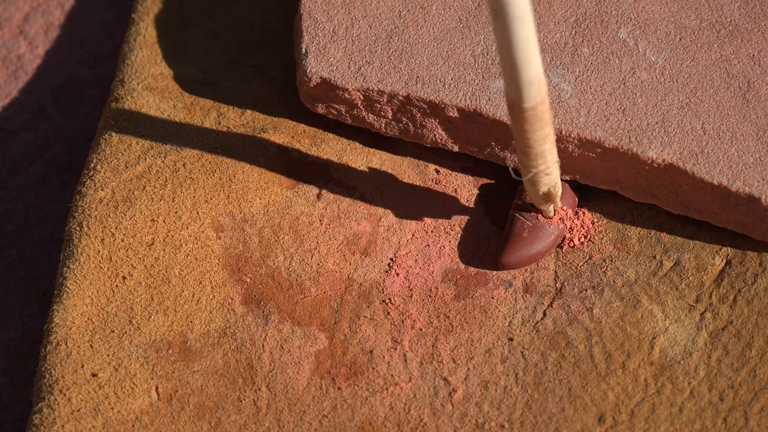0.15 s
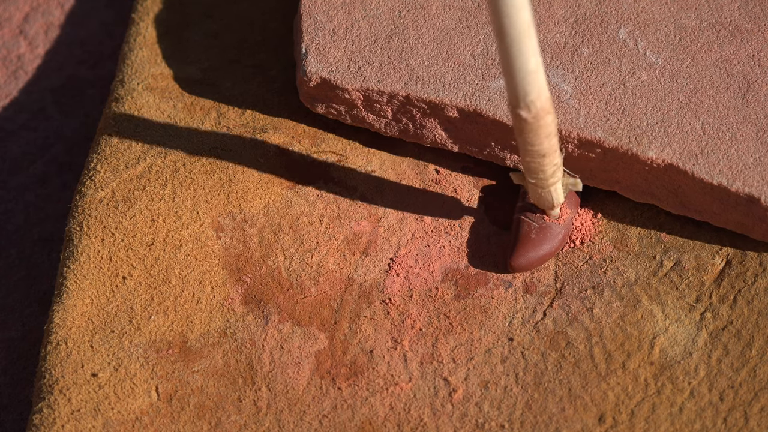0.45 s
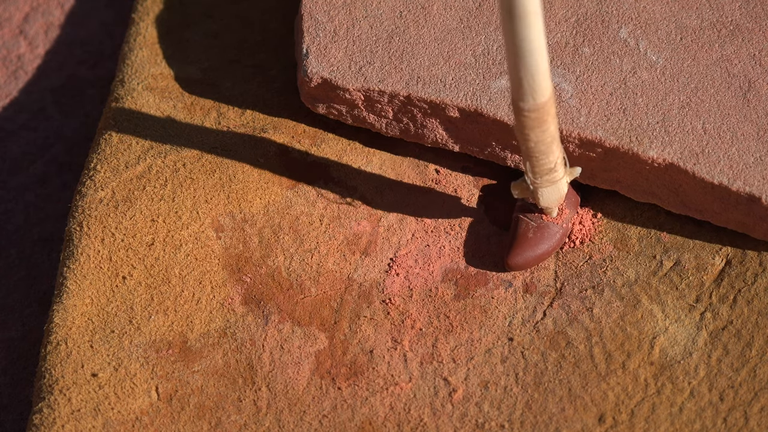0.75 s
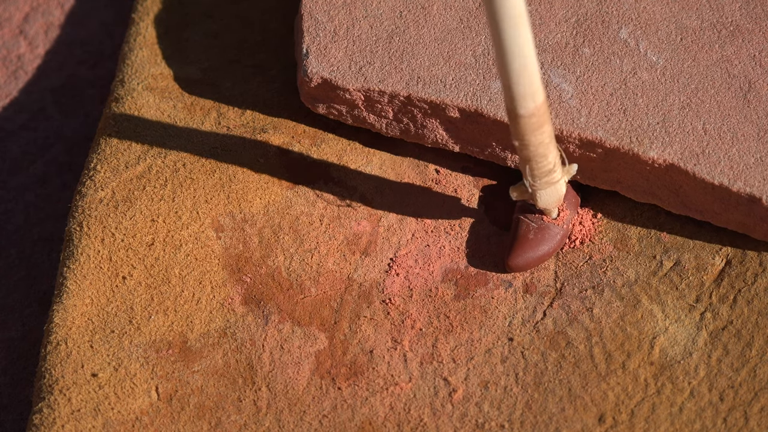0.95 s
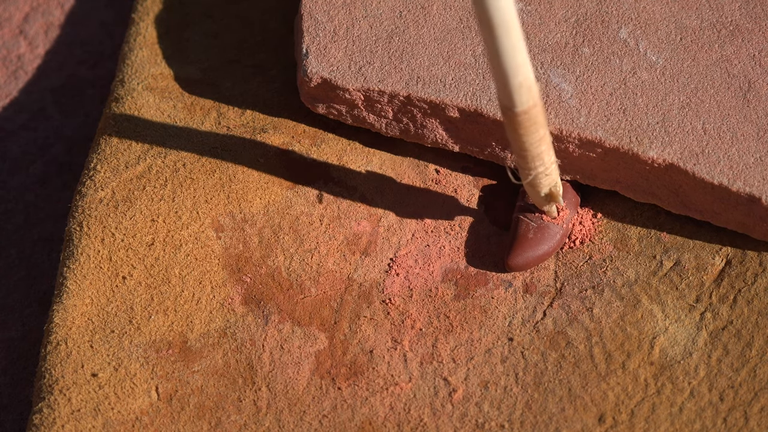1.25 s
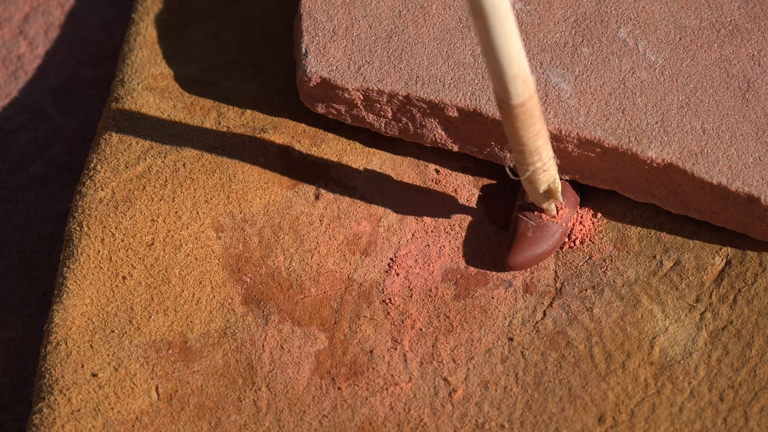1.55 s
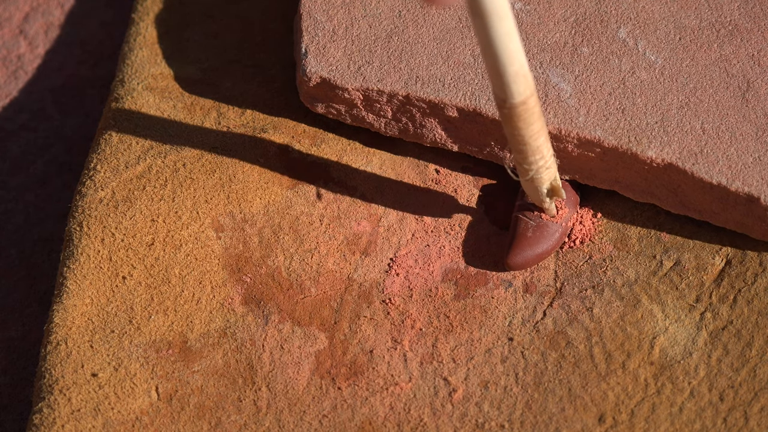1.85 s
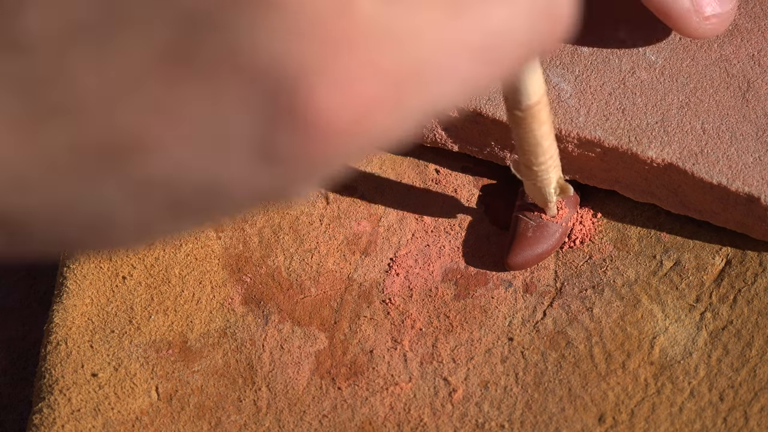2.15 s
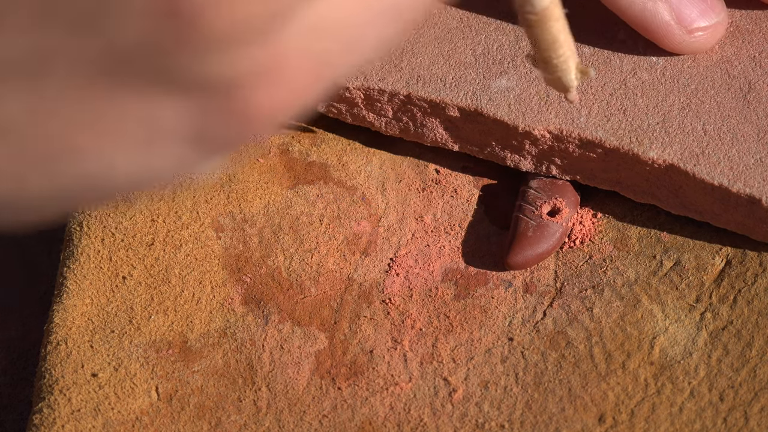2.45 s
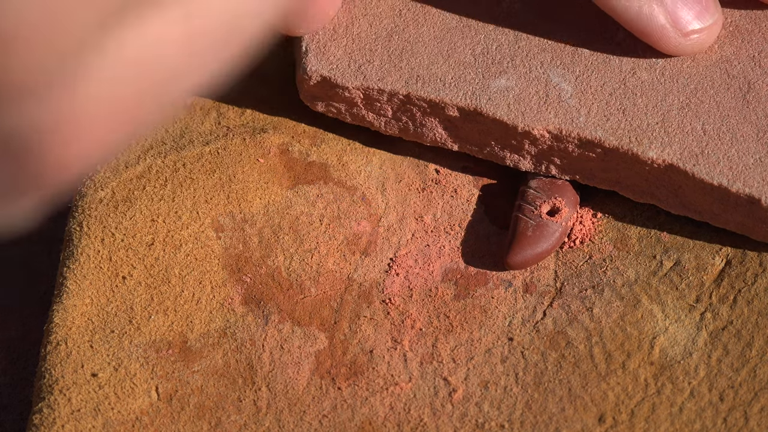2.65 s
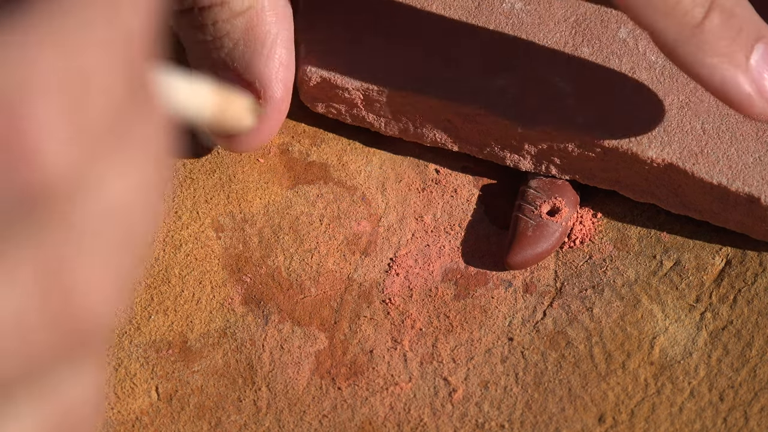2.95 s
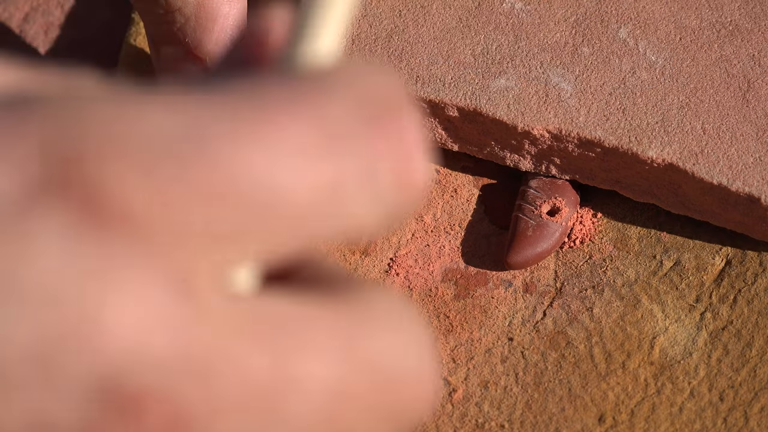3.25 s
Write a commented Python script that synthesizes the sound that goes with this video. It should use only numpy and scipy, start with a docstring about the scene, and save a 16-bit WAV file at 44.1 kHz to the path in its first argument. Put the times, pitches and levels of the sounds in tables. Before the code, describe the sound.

A hand drill grinds into a small stone in short twists, then scrapes loose.

```python
"""Gritty crunching comes first: a stone-tipped wooden drill is twisted four times in a small soft stone.
Its tip crushes grains, catches and chatters. Then fingers slide on the shaft with a faint squeak,
the tip scrapes and snaps loose from the hole, and a hand reaches in.
Behind it all, light air rumbles on the microphone over a quiet hiss, and a thin whistle comes and goes."""
import sys
import numpy as np
from scipy import signal
from scipy.fft import rfft, irfft
from scipy.io import wavfile
from scipy.ndimage import uniform_filter1d

SR = 44100
rng = np.random.default_rng(int(sys.argv[2]) if len(sys.argv) > 2 else 0)


def put_to_file(sound):
    """Save the sound as 16-bit audio at rate SR, in the file named by the first command-line argument."""
    columns = np.atleast_2d(sound).T  # one column per channel
    safe = np.clip(columns, -1, 1)
    whole_steps = np.round(safe * 32767)
    wavfile.write(sys.argv[1], SR, whole_steps.astype(np.int16))


N = 149940
T = np.arange(N) / SR  # time of each sample [s]
HZ = np.maximum(np.arange(N // 2 + 1) * SR / N, 1)  # frequency of each point in a spectrum [Hz]

# Movements, each fading in and out: (start [s], rise [s], hold [s], fall [s], level [dB])
TWISTS = [(-.03, 0.064, 0.11, 0.1, -39.5), (.235, 0.049, 0.14, 0.041, -40), (.49, 0.11, 0.11, 0.038, -38),
          (.745, 0.084, 0.088, 0.11, -40.5)]  # the drill turns in the hole
TIP_DRAG = (.25, .22, .45, .1, -59)  # the tip keeps dragging lightly between twists
STONE_KNOCK = (.352, .006, .01, .018, -45)  # the hardest push knocks the stone on its slab
SCRAPES = [(2.0805, 0.0019, 0.035, 0.019, -33.5), (2.06, 0.039, 0.05, 0.047, -41),
           (1.927, 0.16, 0.04, 0.18, -46.5)]  # the tip scrapes loose
PALM_ROLLS = [(-.06, 0.2, 0.039, 0.058, -48.5), (.215, 0.087, 0.066, 0.11, -43),
              (.48, 0.15, 0.053, 0.046, -41), (.73, 0.11, 0.033, 0.15, -40)]  # palms roll the shaft with each twist
FINGER_SLIDES = [(.93, .073, .1, .3, -55), (1.2, 0.37, .02, .11, -49), (1.732, .012, .003, 0.058, -46.5),
                 (1.785, 0.022, .012, 0.055, -48), (1.77, 0.14, .04, .19, -46.5), (2.0, .07, .18, .08, -55),
                 (2.33, .011, .014, .012, -53), (3.02, .025, .003, .015, -53.5),
                 (3.08, 0.077, .018, .022, -51.5), (3.19, 0.042, .11, 0.06, -51.5)]  # fingers slide on the wood
ARM_SWEEPS = [(1.85, .22, 0.12, 0.19, -50), (2.42, 0.29, 0.22, 0.11, -50)]  # the arm sweeps in

# The tip catches: (time [s], length [s], crunch level [dB], crunch pitch [Hz],
# chatter pitch [Hz], chatter level [dB], chatter bend to either side [Hz])
CATCHES = [(.044, 0.017, -35, 3550, 2700, -34, -200), (.073, 0.02, -39, 5500, 2580, -39.5, 200),
           (0.098, 0.019, -34.5, 5600, 2470, -41.5, -1), (0.132, .015, -36.5, 8050, 2470, -35, -350),
           (0.161, .014, -37.5, 4180, 2236, -35, -350), (0.289, .010, -37, 5250, 2390, -31.5, -150),
           (0.311, .011, -37.5, 5000, 2460, -33, -350), (0.327, 0.012, -34.5, 5000, 1720, -42, -300),
           (.354, 0.013, -28, 4270, 4170, -35, 499.5), (.365, 0.011, -29.5, 8700, 4663, -28.5, 400),
           (.383, 0.01, -33.5, 4200, 2900, -50, 0.5), (0.416, 0.016, -34.5, 4890, 2570, -44, 1),
           (.545, 0.0041, -45, 3400, 3300, -40, -200), (0.558, .013, -39, 3160, 2350, -34.5, -200),
           (.644, 0.012, -30.5, 6400, 3200, -33, -600), (.651, 0.0092, -28, 4260, 2625, -27, -150),
           (0.671, 0.017, -35.5, 3880, 2265, -33, -300), (0.712, .011, -39, 6800, 2150, -47.5, 0),
           (.727, 0.012, -33, 6200, 2030, -34.5, -150), (0.832, 0.011, -43, 4400, 2364, -34.5, 250),
           (0.855, 0.025, -32.5, 4660, 2727, -32, 300.5), (0.894, 0.018, -29, 5830, 1723, -37.5, -200),
           (0.925, 0.019, -39.5, 4500, 5120, -40, 599)]
# Sudden sounds: (time [s], level [dB])
BITES = [(.2865, -42), (.353, -31), (0.407, -32.5), (.543, -38), (.638, -28.5)]  # the tip bites into fresh grit
SNAPS = [(2.1175, -18), (2.1345, -29), (2.1555, -29)]  # the tip comes free; each tone of SNAP_TONES adds its own level
# The tones in a snap: (pitch [Hz], relative level [dB], time to fade by 60 dB [s])
SNAP_TONES = [(2940, -11.5, 0.025), (3460, -6.5, 0.02), (3860, -14, .012), (4530, -12, .005),
              (5150, -21, .008)]
# The turning shaft squeaks: (middle [s], half length [s], pitch [Hz], bend to either side [Hz], level [dB])
SHAFT_SQUEAK = (1.11, .11, 5850, 450, -61)
# Noises with a pitch: (start [s], rise [s], hold [s], fall [s], level [dB], pitch [Hz], width [Hz])
SHAFT_RUBS = [(1.735, .012, .004, .02, -58, 2800, 400), (1.735, .01, .004, .02, -56, 12150, 350),
              (2.328, .014, .006, .012, -48, 3100, 1200), (2.356, .004, .002, .009, -52, 2800, 2200),
              (3.17, .009, .002, .01, -54, 5100, 500), (3.21, .025, .012, .04, -54, 4850, 140),
              (3.28, .03, .025, .03, -58, 4850, 130), (3.305, .015, .01, .022, -55.5, 2720, 200),
              (3.2, .035, .09, .05, -62, 8700, 250), (3.19, .045, .07, .07, -59, 3800, 1200)]
WHISTLES = [(1.135, 0.11, 0.036, 0.13, -54.5, 760, 130), (2.35, 0.16, 0.116, .09, -57, 1263, 120),
            (2.955, 0.1, 0.23, .07, -60, 1310, 69.6), (3.148, 0.04, 0.045, .025, -49, 1338, 54.5)]

# Pitches at which things ring; narrow ones ring longer: (pitch [Hz], width [Hz], relative level [dB])
DRILL_RINGS = [(1420, 90, -1), (2214, 45, -1), (2394, 70, -2), (2688, 40, 2), (2778, 30, 1), (3080, 35, -2),
               (3465, 40, 2), (3800, 50, -2), (3912, 35, -1), (4350, 60, 0), (4590, 55, 0), (4835, 40, -3),
               (4935, 45, -5), (5160, 45, 1), (5640, 50, -3), (6200, 50, -3), (6325, 40, 0),
               (8250, 250, -7)]  # drill and stone together
KNOCK_RINGS = [(371, 40, 8), (608, 50, 3), (888, 40, 3)]
SCRAPE_RINGS = [(750, 110, 2), (2950, 90, 2), (3460, 60, 0), (3740, 70, 0), (4540, 90, 1)]
SHAFT_RINGS = [(2110, 100, 4), (2760, 140, 5), (4780, 150, 0), (5800, 170, -2), (6800, 110, -2),
               (7200, 110, -2), (8180, 230, 2), (9450, 220, -1), (10800, 240, 1), (12200, 260, 3),
               (13580, 180, 1)]

# The colour of each noise, or how strong it is from low to high: (frequency [Hz], relative level [dB])
GRIND_COLOUR = [(150, -30), (400, -15), (1100, -13), (1400, -8), (1580, -13), (1850, 0), (2700, -3),
                (3150, -1.5), (4500, -2), (5500, -2.5), (6400, -2.5), (8500, -7.5), (9600, -12.5),
                (13000, -13), (16000, -19.5)]
CRUNCH_COLOUR = [(150, -21), (400, -14), (1100, -13), (1450, -4), (2000, 1), (2700, 0), (3200, 1.5),
                 (4400, 1.5), (5500, -2), (6400, 1), (8300, -3), (10000, -7.5), (16000, -7)]
KNOCK_COLOUR = [(100, -14), (230, -3), (700, -6), (3000, -32)]
SCRAPE_COLOUR = [(100, 0), (280, 0.5), (520, 6), (760, -1), (1100, 1), (1350, -7), (2650, -7), (2900, -2),
                 (3800, 2.5), (5200, -1), (5700, -5.5), (8000, -10), (11000, -15.5), (16000, -33)]
ROLL_COLOUR = [(500, -16), (1500, 2), (2200, -0.5), (5000, -4.5), (8300, -5), (10000, -2.5), (12200, -0.5),
               (16000, 0)]
SLIDE_COLOUR = [(500, -20), (2000, -8.5), (3500, -3.5), (6000, -1), (8300, -1.5), (10000, -3.5),
                (12300, -2), (14000, -6), (16000, 2)]
SWEEP_COLOUR = [(200, -2), (800, 4.5), (1600, 3.5), (2500, 3.5), (4000, 0.5), (7000, -5), (16000, -15.5)]
SWAY_COLOUR = [(5, -7), (13, 2), (22, 1.5), (32, -10), (50, -25.5), (100, -40), (300, -89.5)]
RUMBLE_COLOUR = [(15, -16), (35, -0.5), (50, 0.5), (80, -9), (125, -18.5), (250, -33.5), (600, -53.5)]
HISS_COLOUR = [(60, 8.5), (150, 5), (300, 0.5), (500, -1), (750, -0.5), (1100, -4), (1600, -11),
               (3000, -14), (6000, -16.5), (10000, -20), (16000, -21)]

# How the air's deep sway and the rumble above it rise and fall: (time [s], relative level [dB])
SWAY_LEVELS = [(0.0, -32.5), (0.42, -26.5), (0.74, -36.5), (1.44, -33.5), (1.46, -19.5), (1.61, -35),
               (2.06, -33), (2.25, -48.5), (2.5, -30), (2.67, -38.5), (3.12, -31), (3.4, -37.5)]
RUMBLE_LEVELS = [(0.0, -41), (0.25, -36.5), (0.26, -39), (0.51, -43), (1.02, -45.5), (1.52, -45),
                 (1.57, -41), (1.65, -48.5), (1.9, -43.5), (2.31, -49.5), (2.35, -41.5), (2.48, -58),
                 (2.57, -40), (3.04, -48), (3.1, -41.5), (3.4, -61)]

CHATTER_WIDTH_HZ = 210  # wider makes the chatter's pitch rougher


def grinding():
    """The turning tip crushes thousands of tiny grains, which make the drill and the stone ring."""
    powder = coloured(grit(per_s=7500, spread_db=3), GRIND_COLOUR, DRILL_RINGS)
    powder *= flutter(rate_hz=69, depth_db=3.5)
    return (powder + from_db(-9) * cracking_grains()) * swells(TWISTS + [TIP_DRAG])


def cracking_grains():
    """Larger grains burst, each ringing briefly at one of 16 pitches."""
    pitches_hz = np.geomspace(1900, 8600, 16)
    bursts = sum(rfft(grit(per_s=30, spread_db=-0.5)) * resonance(hz, width_hz=200) for hz in pitches_hz)
    return unit_level(irfft(bursts, N))


def catching():
    """Each time the tip catches, grit crunches and the tip chatters by sticking and slipping."""
    crunch_spectrum = rfft(coloured(grit(per_s=12000, spread_db=2), CRUNCH_COLOUR))
    rings = np.array([from_db(db) * resonance(hz, width) for hz, width, db in DRILL_RINGS])
    strikes = 1 + 1.4 * rng.uniform(-1.25, 1, (len(CATCHES), len(rings)))  # a new mix of rings per catch
    wobble = uniform_filter1d(phase_wobble(CHATTER_WIDTH_HZ), size=24)
    stick_slip = flutter(rate_hz=220, depth_db=3.5)
    out = np.zeros(N)
    for (time, length, crunch_db, crunch_hz, hz, chatter_db, bend_hz), strike in zip(CATCHES, strikes):
        grip = 1 / (1 + (1.86 * np.abs(T - time) / length) ** 3.3)  # a short bump with steep sides
        focus = 1 + 1.8 * resonance(crunch_hz, width_hz=1400)
        crunch = unit_level(irfft(crunch_spectrum * (1 + strike @ rings) * focus, N))
        chatter = rough_tone(wobble, time, length, hz, bend_hz) * stick_slip
        out += grip * (from_db(crunch_db) * crunch + from_db(chatter_db) * chatter)
    return out


def pressing():
    """The tip bites suddenly into fresh grit, and the hardest push knocks the stone on its slab."""
    fade_s = 0.0047
    bite_level = sum(from_db(db) * (T >= time) * np.exp(-np.abs(T - time) / fade_s) for time, db in BITES)
    knock = coloured(grit(per_s=3000, spread_db=1.5), KNOCK_COLOUR, KNOCK_RINGS)
    fresh_grit = coloured(grit(per_s=11000, spread_db=0), GRIND_COLOUR, DRILL_RINGS)
    return fresh_grit * bite_level + knock * swell(*STONE_KNOCK)


def pulling_out():
    """The tip drags up the wall of the hole and snaps free with three ringing clicks."""
    out = coloured(grit(per_s=8000, spread_db=2), SCRAPE_COLOUR, SCRAPE_RINGS) * swells(SCRAPES)
    age = T[:SR // 10]
    snap = sum(from_db(db - 60 * age / fade) * np.sin(2 * np.pi * hz * age) for hz, db, fade in SNAP_TONES)
    for time, db in SNAPS:
        start = int(time * SR)
        out[start:start + len(snap)] += from_db(db) * snap
    return out


def handling():
    """Skin rolls, slides and rubs on the wooden shaft, and the arm sweeps in."""
    rolls = coloured(white_noise(), ROLL_COLOUR, SHAFT_RINGS) * swells(PALM_ROLLS)
    slides = coloured(grit(per_s=7000, spread_db=2), SLIDE_COLOUR, SHAFT_RINGS) * swells(FINGER_SLIDES)
    slides *= flutter(rate_hz=170, depth_db=1)
    rubs = sum(pitched_noise(hz, width) * swell(*shape) for *shape, hz, width in SHAFT_RUBS)
    sweeps = coloured(grit(per_s=12000, spread_db=-0.5), SWEEP_COLOUR) * swells(ARM_SWEEPS)
    return rolls + slides + rubs + sweeps


def shaft_squeak():
    """A thin, rough squeak rises as the shaft turns between the fingers."""
    middle, half_length, hz, bend_hz, db = SHAFT_SQUEAK
    wobble = phase_wobble(2 * CHATTER_WIDTH_HZ)
    arch = np.clip(1 - ((T - middle) / half_length) ** 2, 0, 1)
    return from_db(db) * arch * rough_tone(wobble, middle, half_length, hz, bend_hz)


def moving_air():
    """Light air pushes on the microphone, making a very deep sway and a low rumble."""
    sway_db = 3 + np.interp(T, *np.transpose(SWAY_LEVELS))
    rumble_db = 2 + np.interp(T, *np.transpose(RUMBLE_LEVELS))
    sway = coloured(white_noise(), SWAY_COLOUR) * from_db(sway_db)
    rumble = coloured(white_noise(), RUMBLE_COLOUR) * from_db(rumble_db)
    return sway + rumble


def faint_whistle():
    """A thin, breathy whistle comes and goes."""
    return sum(pitched_noise(hz, width) * swell(*shape) for *shape, hz, width in WHISTLES)


def quiet_hiss():
    """A soft, steady hiss lies under everything."""
    return from_db(-50.5) * coloured(white_noise(), HISS_COLOUR)


def from_db(db):
    """Turn decibels into a number to multiply a sound by."""
    return 10 ** (np.asarray(db) / 20)


def unit_level(x):
    """Scale a sound so that its average (RMS) level is 1."""
    return x / np.sqrt(np.mean(x ** 2) + 1e-20)


def white_noise():
    """Noise that is equally strong at all frequencies."""
    return rng.standard_normal(N)


def grit(per_s, spread_db):
    """Tiny clicks at random moments; the further spread_db is from 0, the more their sizes differ."""
    sizes = from_db(spread_db * np.minimum(rng.exponential(1, N), 4))
    return (rng.random(N) < per_s / SR) * sizes * rng.choice([-1, 1], N)


def resonance(hz, width_hz):
    """How a ringing object answers each frequency: 1 at its own pitch, less further away."""
    return 1 / (1 + 1j * (HZ ** 2 - hz ** 2) / (HZ * width_hz))


def coloured(x, colour, rings=()):
    """Give a sound a broad colour and, if listed, ringing pitches; the result has level 1."""
    hz, db = np.transpose(colour)
    broad = from_db(np.interp(np.log(HZ), np.log(hz), db))
    ringing = 1 + sum(from_db(level) * resonance(pitch, width) for pitch, width, level in rings)
    return unit_level(irfft(rfft(x) * ringing * broad, N))


def pitched_noise(hz, width_hz):
    """Noise narrowed around one pitch, with its slow swings in level evened out."""
    band = irfft(rfft(white_noise()) * resonance(hz, width_hz * np.sqrt(2)) ** 2, N)
    power = np.abs(uniform_filter1d(band * band, int(4 * SR / width_hz) + 1))
    return band / np.sqrt(power + 1e-20)


def phase_wobble(width_hz):
    """A random drift that pushes a wave ahead or behind, smearing its pitch over width_hz."""
    return np.cumsum(white_noise()) * np.sqrt(2 * np.pi * width_hz / SR)


def rough_tone(wobble, middle, half_length, hz, bend_hz):
    """The tone of sticking and slipping: its rough pitch bends as the pressure changes."""
    pitch = hz + bend_hz * np.clip((T - middle) / half_length, -1, 1)
    return np.sqrt(2) * np.cos(2 * np.pi * np.cumsum(pitch) / SR + wobble)


def flutter(rate_hz, depth_db):
    """A level that wavers at random, mostly slower than rate_hz."""
    waver = unit_level(irfft(rfft(white_noise()) / (1 + (HZ / rate_hz) ** 2), N))
    return unit_level(from_db(depth_db * waver))


def swell(start, rise, hold, fall, db):
    """A level that rises, holds and falls in straight lines."""
    end = start + rise + hold + fall
    return from_db(db) * np.clip(np.minimum((T - start) / rise, (end - T) / fall), 0, 1)


def swells(rows):
    """The joint level of several movements."""
    return np.sqrt(sum(swell(*row) ** 2 for row in rows))


def scene():
    """Add all the sounds in one channel, close by and with no echo."""
    drill = grinding() + catching() + pressing() + pulling_out()
    hands = handling() + shaft_squeak()
    background = moving_air() + faint_whistle() + quiet_hiss()
    return (drill + hands + background)[None]


def record(dry):
    """Cut away the very highest treble steeply."""
    cutoff_hz = 15750
    return signal.sosfilt(signal.ellip(12, .1, 80, cutoff_hz, fs=SR, output="sos"), dry)


dry = scene()
out = record(dry)
put_to_file(out)
```